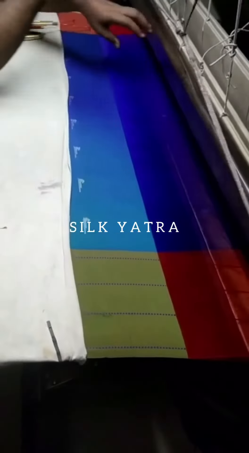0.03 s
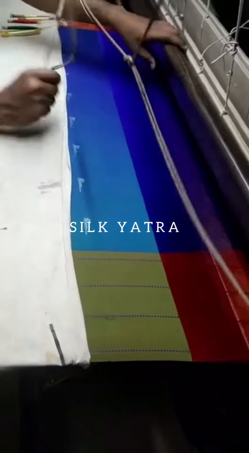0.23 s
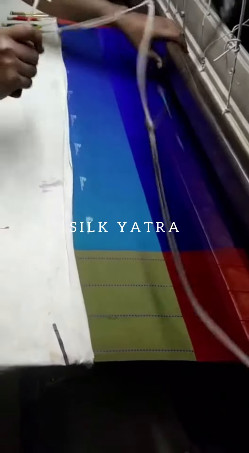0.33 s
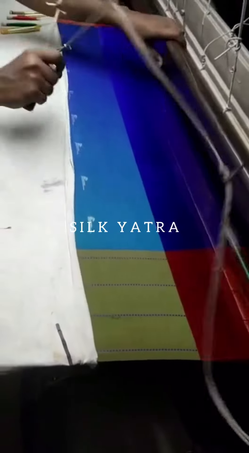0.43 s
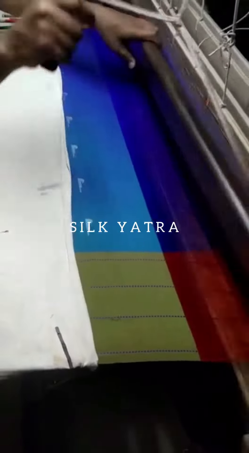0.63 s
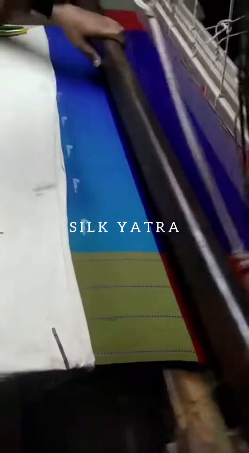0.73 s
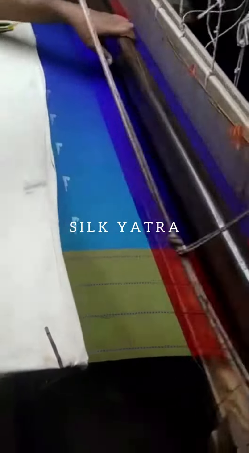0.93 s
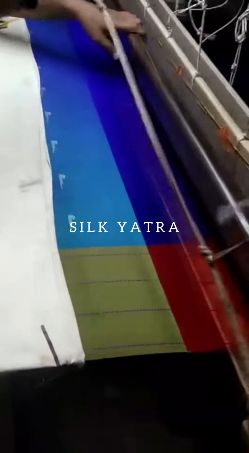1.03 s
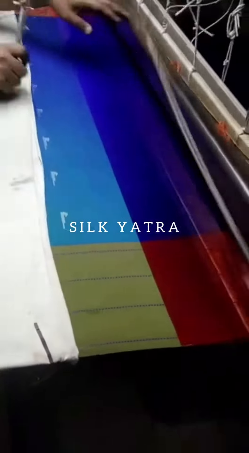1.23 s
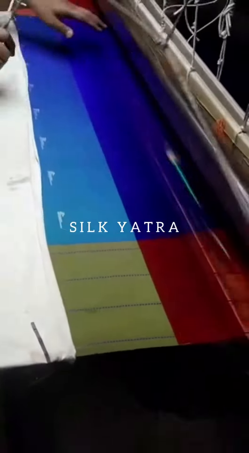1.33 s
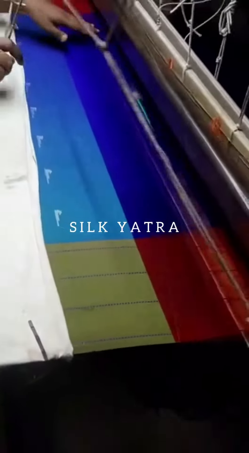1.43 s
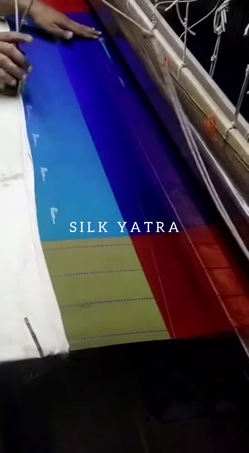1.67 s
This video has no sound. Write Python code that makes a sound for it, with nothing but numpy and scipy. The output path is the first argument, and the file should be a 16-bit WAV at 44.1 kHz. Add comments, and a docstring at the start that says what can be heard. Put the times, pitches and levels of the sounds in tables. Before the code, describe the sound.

A wooden handloom clacks and rattles close by. Light knocks and thin ticks build into a dense clatter of shuttle and beater, then a last smaller burst dies away in a slightly echoing room.

```python
"""Handloom in a hard-walled room

A wooden handloom is worked close by. Cords jerk, the shuttle is thrown and the beater swings: each blow,
and the rattle of loose parts after it, excites the damped modes of the frame, the wooden bars, the reed
and the small fittings. Sharp ticks sit on top, the frame booms faintly below, and the room reverberates."""
import sys
import numpy as np
from scipy import signal
from scipy.fft import rfft, irfft
from scipy.io import wavfile
from scipy.ndimage import uniform_filter1d

SR = 44100
rng = np.random.default_rng(int(sys.argv[2]) if len(sys.argv) > 2 else 0)


def pcm_store(signal):
    """Save signal as 16-bit PCM."""
    levels = np.round(np.clip(np.atleast_2d(signal), -1, 1) * 32767)
    wavfile.write(sys.argv[1], SR, levels.astype(np.int16).T)


N = 74970
T = np.arange(N) / SR


def undb(db):
    """Amplitude ratio of a level in decibels."""
    return 10 ** (np.asarray(db) / 20)


def unit(x):
    """Normalisation to an rms of 1."""
    return x / np.sqrt(np.mean(x ** 2) + 1e-18)


def noise():
    """Two uncorrelated white noises."""
    return rng.standard_normal((2, N))


def fade(start, t60, attack_s=0.00054):
    """Envelope of free decay: a quick rise, then a fall of 60 dB in t60 seconds."""
    age = np.maximum(T - start, 0)
    return (1 - np.exp(-age / attack_s)) * np.exp(-np.log(1000) * age / t60)


def burst(start, length, attack_s=0.0037, release_s=0.0071):
    """Envelope of driven vibration: linear rise, hold, exponential release."""
    return np.clip((T - start) / attack_s, 0, 1) * np.exp(-np.maximum(T - start - length, 0) / release_s)


def convolve(x, response):
    """Output of a linear system with the given impulse response."""
    return signal.fftconvolve(x, np.atleast_2d(response), axes=-1)[:, :N]


def band(x, lo_hz, hi_hz, order=2):
    """Butterworth band-pass filter."""
    sos = signal.butter(order, [lo_hz, min(hi_hz, SR / 2 - 1)], "band", fs=SR, output="sos")
    return signal.sosfilt(sos, x)


def lookup(hz, points):
    """Interpolation of (frequency, value) points on a logarithmic frequency axis."""
    f, value = np.array(points).T
    return np.interp(np.log(hz + 1), np.log(f), value)


def modal_response(modes, lo_hz, hi_hz):
    """Modal superposition: damped sinusoids sum to a band-limited impulse response of unit energy."""
    t = T[:N // 4]
    ring = sum((-1) ** k * undb(db) * width * np.exp(-np.pi * width * t) * np.cos(2 * np.pi * hz * t)
               for k, (hz, width, db) in enumerate(modes))
    ring = band(ring + 1e-18, lo_hz, hi_hz)
    return ring / np.sqrt(np.sum(ring ** 2))


def pan(db):
    """Intensity panning: gains that put the left channel db above the right."""
    return undb(np.array([[db], [-db]]) / 2)


# stereo width (frequency [Hz], side relative to mid [dB])
SIDE_LEVEL = [(60, -14), (110, -18), (190, -12), (350, -8.5), (630, -1.5), (1120, 3.5), (2020, -0.5),
              (3630, 1), (11700, 2)]

def spread(x):
    """Partial coherence: two signals, as mid and side, make left and right alike only in the bass."""
    side_gain = undb(lookup(np.fft.rfftfreq(N, 1 / SR), SIDE_LEVEL))
    mid, side = rfft(x) / np.sqrt(1 + side_gain ** 2)
    return irfft(np.array([mid + side_gain * side, mid - side_gain * side]), N)


# spectrum of the room air (frequency [Hz], relative spectral density [dB])
AIR_SPECTRUM = [(15, -64), (25, -10), (101, -2), (124, -12.5), (225, -6.5), (276, -9.5), (314, -7.5),
                (648, -11.5), (1680, -8.5), (12000, -32), (15600, -73), (22000, -120)]

def background(air_db=-50, ring_db=-43.5, ring_t60_s=0.29):
    """Incoherent addition: quiet room air and the fading ring of an earlier stroke sum in power."""
    gain = undb(lookup(np.fft.rfftfreq(N, 1 / SR), AIR_SPECTRUM))
    air = unit(irfft(rfft(noise()) * gain, N))
    return spread(air) * np.hypot(undb(air_db), undb(ring_db) * fade(0, ring_t60_s))


# lowest modes of the frame (frequency [Hz], bandwidth [Hz], relative level [dB])
BOOM_MODES = [(90, 13, -3.5), (109, 5.2, 2), (178, 87, -12.5)]
# envelope of their hum (time [s], level [dB])
BOOM_ENVELOPE = [(0, -68), (0.19, -63), (0.31, -39), (0.58, -53.5), (0.75, -46), (1.0, -41.5), (1.2, -49),
                 (1.45, -54), (1.7, -58)]
# dull thuds as the beater changes direction (time [s], level [dB])
BEATER_THUDS = [(0.471, -45), (0.765, -46), (1.17, -55)]

def boom():
    """Forced vibration: the heavy frame hums as it is shaken and thuds when the beater turns."""
    time, level_db = np.array(BOOM_ENVELOPE).T
    ring = convolve(noise(), modal_response(BOOM_MODES, 81, 310))
    running_rms = np.sqrt(uniform_filter1d(ring ** 2, size=int(.12 * SR)) + 1e-9)
    hum = ring / running_rms * undb(np.interp(T, time, level_db))
    thud_envelope = sum(undb(db) * fade(start, t60=1, attack_s=0.0033) for start, db in BEATER_THUDS)
    thuds = unit(band(noise(), lo_hz=30, hi_hz=76.5)) * thud_envelope
    return spread(hum + thuds)


def chatter(hits_per_s=960, scatter_db=2.0):
    """Poisson process: the force envelope of many small impacts of uneven size, steady on average."""
    hits = rng.random(N) < hits_per_s / SR
    sizes = undb(scatter_db * np.minimum(rng.exponential(size=N), np.pi))
    power = np.abs(signal.fftconvolve((hits * sizes) ** 2, fade(0, t60=0.011) ** 2)[:N]) + 1e-9
    return np.sqrt(power / uniform_filter1d(power, size=1100))


# single blows (time [s], frame level [dB], bars level [dB], reed level [dB], fittings level [dB])
BLOWS = [(0.223, -34, -20, -33, -30), (0.232, -32, -22, -16.5, -20.5), (0.478, -34, -10.5, -10.5, -23),
         (0.48, -42, -32, -15, -8.5), (0.511, -50, -20, -32, -19), (0.521, -28.5, -33, -40, -32),
         (0.535, -48, -15, -8.5, -11), (0.572, -30, -12.5, -27, -13), (0.589, -33, -13, -22, -15.5),
         (0.625, -46, -26, -22, -13.5), (0.692, -39, -18.5, -23, -27), (0.773, -18.5, -14.5, -12.5, -8),
         (0.778, -23, -34, -25, -7), (0.789, -49, -9, -9.5, -9), (0.852, -27.5, -14, -17, -24),
         (0.865, -37, -8.5, -8.5, -8), (0.869, -36, -24, -11, -16), (0.893, -47, -39, -21, -6.5),
         (0.98, -26.5, -24, -23, -21), (1.033, -32, -30, -24, -18.5), (1.107, -44, -25, -25, -34),
         (1.123, -51, -26.5, -46, -46), (1.19, -55, -37, -48, -35), (1.270, -35, -15.5, -13.5, -14.5),
         (1.291, -51, -23, -20.5, -11.5), (1.302, -37, -19.5, -21.5, -16), (1.327, -31, -27, -33, -31),
         (1.376, -48, -28, -24, -25), (1.626, -48.5, -30.5, -32, -30)]
# rattles of loose parts (time [s], duration [s], then the same four levels [dB])
LOOSE_RATTLES = [(0.18, 0.013, -66, -33.5, -33.5, -39.5), (0.196, 0.025, -63, -39, -47, -46),
                 (0.245, 0.035, -43.5, -27.5, -31.5, -39), (0.271, 0.013, -34.5, -22, -26, -25.5),
                 (0.297, 0.052, -39, -36.5, -35, -29), (0.396, 0.058, -47, -53, -40.5, -33.5),
                 (0.488, 0.049, -35, -24.5, -18.5, -20.5), (0.55, 0.0897, -38, -24, -22, -26.5),
                 (0.653, 0.096, -46, -37, -32, -33.5), (0.759, 0.095, -36, -25.5, -21.5, -21.5),
                 (0.842, 0.048, -51, -27, -23.5, -21), (0.886, 0.100, -36, -26.5, -20, -18),
                 (0.996, 0.056, -46.5, -29.5, -28.5, -34), (1.159, 0.27, -48.5, -36, -41, -45),
                 (1.266, 0.058, -40.5, -26.5, -33.5, -24.5), (1.321, 0.060, -64, -32.5, -33.5, -32),
                 (1.459, 0.110, -62, -48.5, -53, -42)]
# modes of each part (frequency [Hz], bandwidth [Hz], relative level [dB])
FRAME_MODES = [(253, 47, -3), (323, 69, -1), (469, 97, 0), (670, 203, -3)]
BAR_MODES = [(830, 173, -4), (1078, 170, -2.5), (1320, 240, -1), (1750, 116, 0.5), (1870, 144, -1),
             (2373, 347, -2)]
REED_MODES = [(2694, 380, -1.5), (3586, 760, -3), (4410, 420, 0), (4925, 580, -0.5), (5760, 500, -2)]
FITTING_MODES = [(6180, 590, 3), (7220, 800, 2.5), (7960, 750, 2.5), (8940, 690, 2), (10070, 600, -1),
                 (11070, 380, -2), (11510, 690, -4)]
# passband of each part, in that order (lower edge [Hz], upper edge [Hz])
PART_BANDS = [(200, 640), (740, 2830), (2400, 5770), (5900, 10900)]
# direction of each part (left minus right [dB])
PART_PANS = [-0.7, 0.7, 1.4, 2.8]

def loom():
    """Impact excitation: blows and rattles drive the modes of the four parts of the loom."""
    out = 0
    for part, modes in enumerate([FRAME_MODES, BAR_MODES, REED_MODES, FITTING_MODES]):
        impacts = chatter()
        power = sum((undb(db[part]) * fade(start, t60=.04)) ** 2 for start, *db in BLOWS)
        for start, length, *db in LOOSE_RATTLES:
            power = power + (undb(db[part]) * burst(start, length) * impacts) ** 2
        force = np.sqrt(power) * noise()
        ring = convolve(force, modal_response(modes, *PART_BANDS[part]))
        out = out + pan(PART_PANS[part]) * spread(ring)
    return out


# modes of a light wooden piece (frequency [Hz], level [dB], decay time T60 [s])
LIGHT_WOOD_MODES = [(816, -35, 0.062), (910, -34, 0.085), (1744, -34.5, 0.071), (1750, -28, .05),
                    (2680, -32, 0.069), (4160, -45, .04)]

def tap(start_s=0.183):
    """Free vibration: a light wooden piece, knocked once as the stroke opens, rings in a few modes."""
    out = 0
    for hz, db, t60 in LIGHT_WOOD_MODES:
        mode = np.sin(2 * np.pi * (hz * T + rng.random((2, 1)) / 4))
        out = out + undb(db) * fade(start_s, t60, attack_s=0.0018) * mode
    return out


# contacts of shuttle tip, rings and heddles (time [s], frequency [Hz], level [dB], left minus right [dB])
HARD_CONTACTS = [(0.2308, 6930, -13, 10), (0.242, 7900, -17, 3), (0.252, 7600, -21, 12),
                 (0.317, 9660, -14.5, 11), (0.332, 9400, -15, -6), (0.344, 9700, -10.5, 8),
                 (0.376, 9100, -19, 12), (0.394, 9300, -32, 1), (0.406, 8700, -15.5, 11),
                 (0.416, 9400, -33, -3), (0.434, 9000, -18.5, 12), (0.452, 8600, -28, 1),
                 (0.462, 9600, -16, 16), (0.471, 9400, -15, 5), (0.4825, 7880, -1, 4),
                 (0.491, 8110, -9, 17), (0.538, 8200, -10, 9), (0.687, 8500, -21, -1),
                 (0.737, 10500, -17, 1), (0.762, 8400, -7.5, 1), (0.77, 9200, -11, -4),
                 (1.233, 9010, -13.5, 11), (1.237, 9200, -17, -5), (1.2697, 7875, -2.5, 3),
                 (1.2738, 10300, -4, 0), (1.378, 4300, -24, -17), (1.627, 3330, -25, -11.5)]

def ticks(relative_bandwidth=0.3, ring_db=-4.5):
    """Hard contact: a brief impact excites high frequencies, a bright crack with a very short ring."""
    edge_ratio = 1 + relative_bandwidth / 2
    out = 0
    for start, hz, db, pan_db in HARD_CONTACTS:
        crack = unit(band(noise(), hz / edge_ratio, hz * edge_ratio))
        ring = np.sin(2 * np.pi * (hz * T + rng.random((2, 1))))
        out = out + undb(db) * pan(pan_db) * fade(start, t60=0.013) * (crack + undb(ring_db) * ring)
    return out


# brief hoots of a hollow wooden part (time [s], duration [s], frequency [Hz], level [dB])
HOLLOW_HOOTS = [(0.267, 0.028, 973, -23), (0.33, 0.029, 1160, -30.5), (0.514, 0.044, 1190, -26),
                (0.573, 0.037, 1118, -22.5), (0.633, 0.059, 1114, -33), (0.775, 0.017, 1210, -27.5),
                (1.099, 0.021, 1153, -28.5), (1.175, 0.039, 1107, -32)]

def hoots(width_hz=184, mid_db=-6.5):
    """Narrow resonance: a hollow part hoots when shaken, with left and right mostly in antiphase."""
    mid, side = sum(
        unit(band(noise(), hz - width_hz / 2, hz + width_hz / 2)) * undb(db) * burst(start, length)
        for start, length, hz, db in HOLLOW_HOOTS)
    return undb(mid_db) * mid + np.array([side, -side])


def swish(level_db=-31.5):
    """Sliding friction: the pulling cord gives a thin, uneven hiss."""
    hiss = unit(band(noise(), lo_hz=8000, hi_hz=11600, order=3))
    return hiss * chatter() * burst(start=0.32, length=0.12) * undb(level_db)


# reverberation time of the room (frequency [Hz], T60 [s])
REVERB_TIMES = [(200, 0.64), (1000, 0.62), (3000, 0.55), (8000, 0.47), (12000, 0.44)]

def room(x):
    """Diffuse reverberation: dense reflections build up and die away, faster in the treble."""
    edges_hz = np.geomspace(100, 14000, 9)
    reflections = noise()
    tail = 0
    for lo, hi in zip(edges_hz, edges_hz[1:]):
        t60 = lookup(np.sqrt(lo * hi), REVERB_TIMES)
        tail = tail + band(reflections, lo, hi, order=3) * fade(0, t60, attack_s=0.0044)
    return spread(convolve(x, unit(tail) / np.sqrt(N)))


def wandering_room(x, places=4, shift_s=0.08994):
    """Room response depends on source position: as the rattling shifts, its reflections change."""
    out = 0
    for place in range(places):
        distance = np.abs((T / shift_s - place + places / 2) % places - places / 2)
        crossfade = np.cos(np.pi / 2 * np.minimum(distance, 1))
        out = out + room(x * crossfade)
    return out


def scene():
    """Superposition: the direct sound of the loom, its reverberation and the room background."""
    clatter, sharp, hollow = loom() + tap() + swish(), ticks(), hoots()
    reflections = wandering_room(undb(-4) * clatter + undb(-7) * sharp + undb(-8) * hollow)
    return clatter + sharp + hollow + reflections + boom() + background()


def record(dry, ceiling=.76, cutoff_hz=12100):
    """Soft saturation rounds the highest peaks, and a steep low-pass filter limits the bandwidth."""
    rounded = dry / (1 + (dry / ceiling) ** 4) ** .25
    return signal.sosfilt(signal.ellip(10, .2, 80, cutoff_hz, fs=SR, output="sos"), rounded)


dry = scene()
out = record(dry)
pcm_store(out)
```